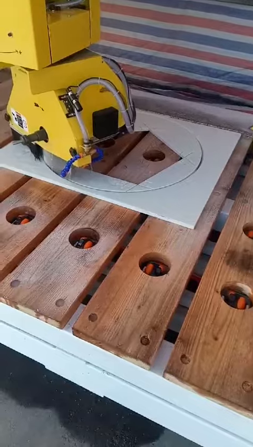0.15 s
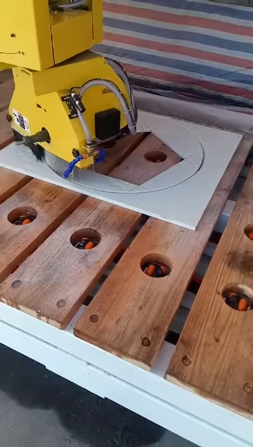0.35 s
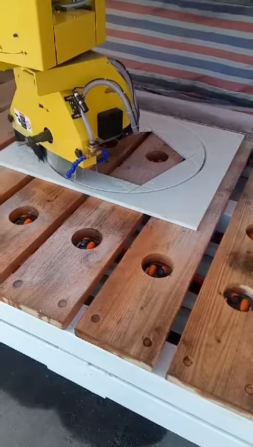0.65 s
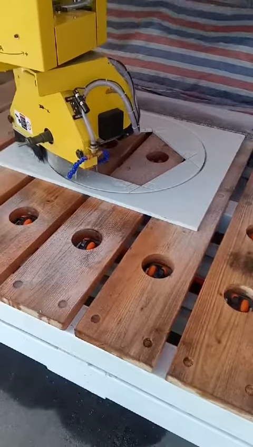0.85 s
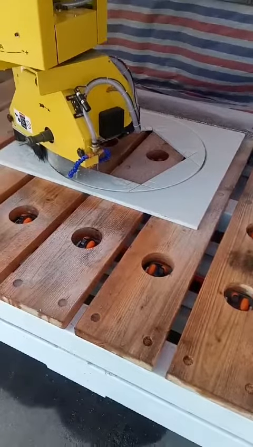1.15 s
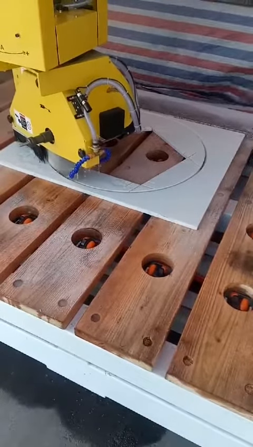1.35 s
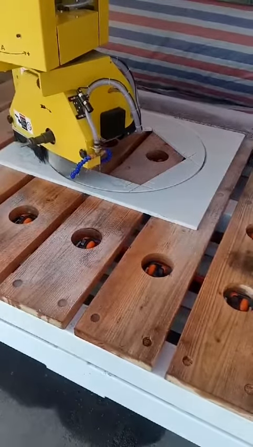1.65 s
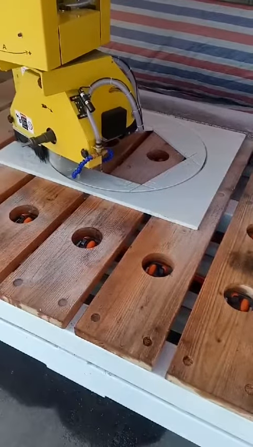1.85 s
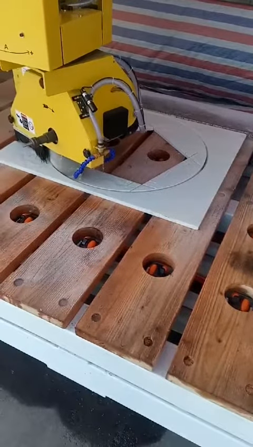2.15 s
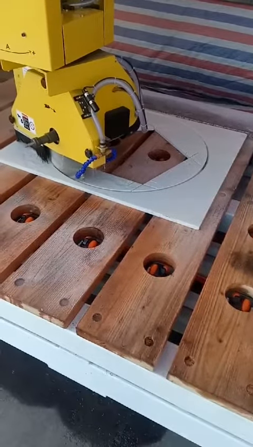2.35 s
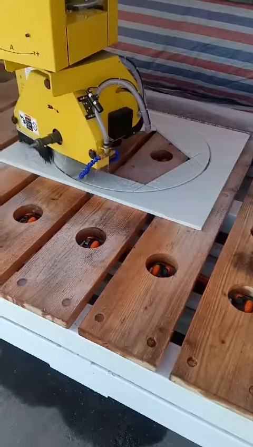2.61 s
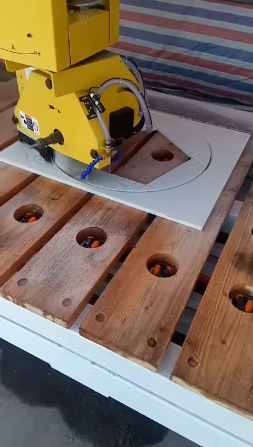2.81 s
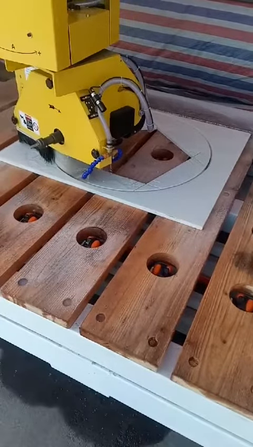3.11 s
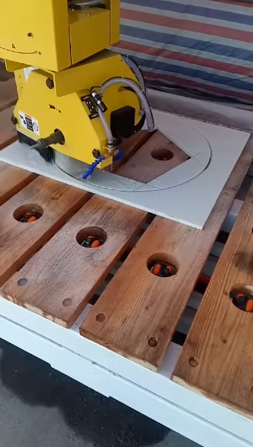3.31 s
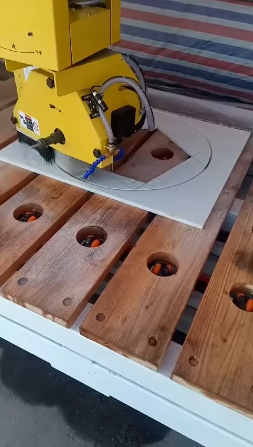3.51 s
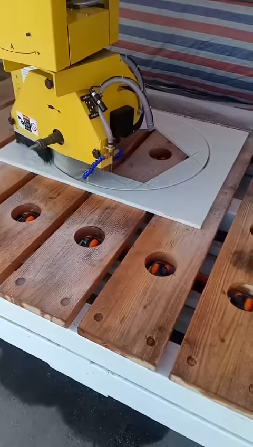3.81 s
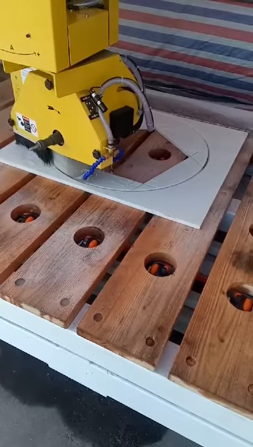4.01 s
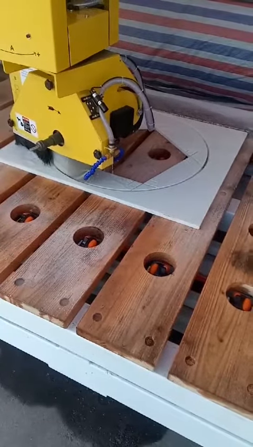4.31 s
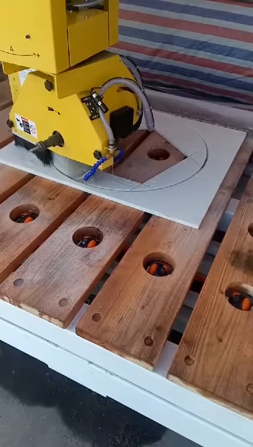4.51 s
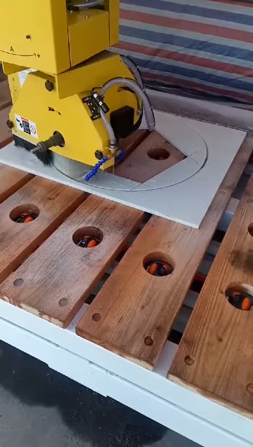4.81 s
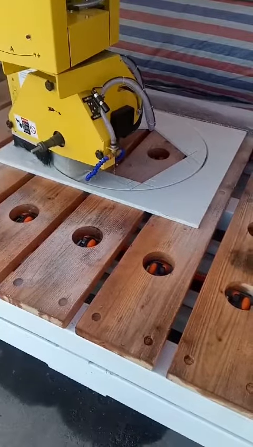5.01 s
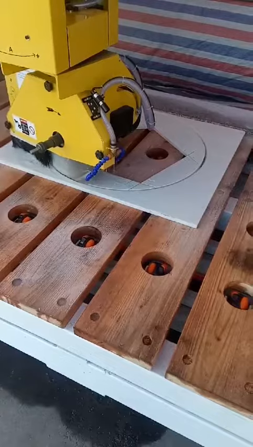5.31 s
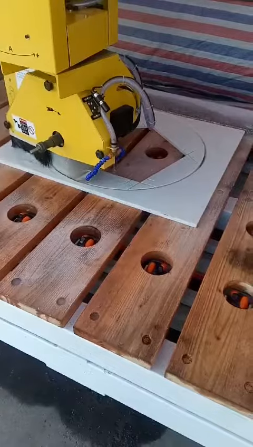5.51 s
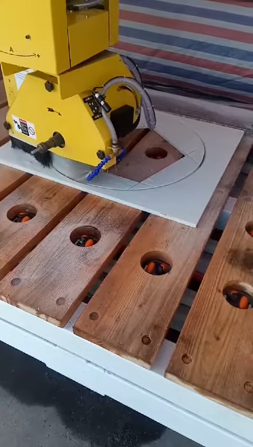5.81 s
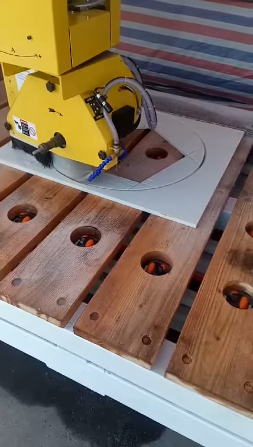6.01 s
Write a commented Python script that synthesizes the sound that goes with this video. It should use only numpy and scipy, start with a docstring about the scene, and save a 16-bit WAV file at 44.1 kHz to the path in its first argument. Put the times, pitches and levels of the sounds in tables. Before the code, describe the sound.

Continuous loud stone cutting, already under way and never stopping. The spinning diamond disc whines at several fixed high pitches with a rapid once-per-turn flutter, over harsh grinding and a raspy motor-rate buzz. Midway the tone shifts, the lower squeal dominates and rumble swells; individual whistles flare and fade. Close, nearly mono pickup, hard-limited, little sense of room.

```python
"""Beside a bridge saw: a water-cooled diamond blade cuts a curve in a stone slab, close to a near-mono microphone.
The rim scrapes nearly the same pattern into the kerf on every turn: a dense buzz on the orders of the spindle.
Blade modes lock onto a few orders and squeal, the lowest much louder as the blade swings into the curve.
Grit rings the disc and a rumble grows with the swing; a limiter holds the peaks.
A faint fluttering stereo hiss lies near 9.6 kHz."""
import sys
import numpy as np
from scipy.fft import rfft, irfft, next_fast_len
from scipy.io import wavfile
from scipy.ndimage import uniform_filter1d, minimum_filter1d, map_coordinates

SR = 44100
rng = np.random.default_rng(int(sys.argv[2]) if len(sys.argv) > 2 else 0)


def to_wav(s):
    """Save 16-bit WAV."""
    ch = np.atleast_2d(s).T  # columns
    pcm = np.round(np.clip(ch, -1, 1) * 32767)  # PCM
    wavfile.write(sys.argv[1], SR, pcm.astype(np.int16))


N = 271345
SPINDLE_HZ, TOP_HZ = 49.552, 15600


def amp(db):
    """Decibels to gain."""
    return 10 ** (np.asarray(db) / 20)


def along(points, hz):
    """(Hz, value) points read on a log axis."""
    point_hz, values = np.transpose(points)
    return np.interp(np.log(hz + 1), np.log(point_hz + 1), values)


def curve(points, t):
    """(s, value) points read at times t."""
    point_s, values = np.transpose(points)
    return np.interp(t, point_s, values)


def wobble(knots_per_s):
    """A smooth random curve through normal-distributed knots."""
    knots = rng.standard_normal(int(N * knots_per_s / SR) + 4)
    return map_coordinates(knots, [np.arange(N) * knots_per_s / SR], mode="mirror")


def drift(shape, memory_turns):
    """Complex chance of rms 1 whose rows, one a turn, stay alike for about memory_turns."""
    z = rng.standard_normal(shape) + 1j * rng.standard_normal(shape)
    cycles_per_turn = np.fft.fftfreq(shape[0])[:, None]
    smoothing = 1 / (1 + (2 * np.pi * memory_turns * cycles_per_turn) ** 2)
    z = np.fft.ifft(np.fft.fft(z, axis=0) * smoothing, axis=0)
    return z / np.sqrt(np.mean(np.abs(z) ** 2))


def filtered(x, response):
    """x times a response of frequency in Hz."""
    m = next_fast_len(N + SR // 4)
    return irfft(rfft(x, m) * response(np.fft.rfftfreq(m, 1 / SR)), m)[..., :N]


def white():
    """Noise of 0 dB per Hz."""
    return rng.standard_normal(N) * np.sqrt(SR / 2)


def spindle(waver_hz=0.012, shake_hz=0.0301):
    """Turns made so far; the load barely disturbs the motor."""
    return np.cumsum(SPINDLE_HZ + waver_hz * wobble(3) + shake_hz * wobble(25)) / SR


def rim(turns, memory_turns=20, dispersion_turns_per_order=.025, scatter_rad=0.9, size=4096, count=314):
    """The scrape of one turn repeats on the next, changing slowly as the blade meets new stone."""
    # Low buzz of spindle, guard and table. Each row: order, dB before the swing, dB at full swing.
    hum_orders = [(1, -67, -51), (2, -56, -52), (3, -48, -50), (4, -50, -49), (5, -50, -50), (6, -37, -33),
                  (7, -42, -37), (8, -29, -29), (9, -39, -41), (10, -40, -42), (11, -30.5, -42),
                  (14, -40, -44), (15, -40, -40), (16, -39, -45), (18, -39, -38), (20, -36, -32),
                  (21, -37, -44), (22, -33, -34), (25, -34, -36), (26, -43, -37), (27, -40, -35),
                  (28, -32, -41), (29, -35, -39), (32, -30, -32)]
    # Orders the steel disc radiates strongly. Each row: order (rounded), dB before the swing, dB at full swing.
    ring_orders = [(33, -67, -35), (35, -26.5, -23), (36, -37.5, -40.5), (37, -25, -34), (38, -29, -24),
                   (41, -27.5, -24.5), (42, -25, -35), (43, -24, -34), (48, -37.5, -26.5), (50, -32.5, -31),
                   (54, -25.5, -32), (55, -21, -27), (56, -38, -26), (60, -22.5, -35.5), (61, -30.5, -22),
                   (62, -22.5, -31.5), (65.98, -26.5, -25), (67, -23.5, -31), (68, -22.5, -25),
                   (74, -26.5, -29), (76.2, -28, -28.5), (78.2, -26, -32), (79, -33.5, -21),
                   (85, -28.5, -23), (86, -26.5, -29.5), (87, -31, -27.5), (93.1, -28.5, -29),
                   (96, -35, -31), (99.5, -33.5, -35), (110, -37, -38), (120, -38, -39.5),
                   (122.8, -34, -36), (130.4, -33.5, -31.5), (145, -42, -46), (159, -50, -43)]
    # All the other orders. Each row: frequency in Hz, level of one order in dB.
    buzz_points = [(600, -47), (1200, -46), (1550, -65), (2200, -33), (3000, -38.5), (3700, -28.5),
                   (4400, -35), (4900, -37.5), (5650, -46.5), (6550, -40), (7500, -45), (8600, -53.5),
                   (10200, -53.5), (14000, -65)]
    # Treble rise and fall as the blade's face turns. Each row: time in s, tilt in dB (weighted over Hz below).
    bright_points = [(0, -0.5), (2, -1.5), (3, 0.5), (4.7, 0.5), (5.3, -1.5), (6.15, -1)]

    order = np.arange(count)
    hz = order * SPINDLE_HZ
    when = np.arange(int(turns[-1]) + 3) / SPINDLE_HZ
    shape = (len(when), count)

    early, late = np.tile(along(buzz_points, hz), (2, 1))
    # loose: share of power that changes; fine kerf detail, in the high orders, most, strong orders half
    loose = np.clip(along([(400, 0.11), (1500, 0.31), (3500, 0.36), (7000, 0.47)], hz), 0, 1)
    for table in (hum_orders, ring_orders):
        for k, early_db, late_db in table:
            early[round(k)], late[round(k)] = early_db, late_db
            loose[round(k)] /= 2

    base_db = early + swing(when)[:, None] * (late - early)
    bright_db = curve(bright_points, when)[:, None] * along([(4300, 0), (5500, 0.95)], hz)
    # single orders swell and sink over about a second
    swell_db = 4 * np.sqrt(loose) * drift(shape, 2 * memory_turns).real
    level_db = base_db + flare(when[:, None], order) + bright_db + swell_db
    level = amp(level_db) * (order > 0)

    # high bending waves cross the disc first: a falling chirp each turn, blurred by random phase
    chirp = np.pi * dispersion_turns_per_order * order ** 2
    blur = scatter_rad * along([(2500, 1.04), (6000, 3.01)], hz) * rng.standard_normal(count)
    lasting = np.exp(1j * (chirp + blur))
    lines = level * (np.sqrt(1 - loose) * lasting + np.sqrt(loose) * drift(shape, memory_turns))
    # one row of waveform a turn, read at the angle of the spindle
    scrape = irfft(lines, size) * size / np.sqrt(2)
    return map_coordinates(scrape, [turns, turns % 1 * size], order=1, mode="grid-wrap")


def squeal(turns, bed, flutter_db=1.0, jitter_rad=0.048, half_width_hz=230):
    """Self-excited blade modes added to the bed; disc run-out chokes each and bends its pitch once a turn."""
    # Each row: order (rounded), dB before the swing, dB at full swing, angle of the choke in turns,
    # depth of the choke 0-1, sharpness of the choke, phase swing in rad.
    locked_modes = [(39, -23.5, -15.5, 0.56, 0.81, 3.6, 0.37), (53, -25, -25.5, 0.23, 0.2, 0.43, -0.06),
                    (75.03, -21, -20, 0.28, 0.57, 2.1, 0.034), (83.95, -23, -21, 0.92, 0.88, 0.18, -0.14)]
    out = bed.copy()
    for k, early_db, late_db, choke_turn, depth, sharpness, phase_swing in locked_modes:
        order = round(k)
        angle = 2 * np.pi * (turns - choke_turn)
        grip = 1 - np.clip(depth, 0, 1) * np.exp(sharpness * (np.cos(angle) - 1))
        phase = 2 * np.pi * order * turns + phase_swing * np.sin(angle) + jitter_rad * wobble(60)
        level_db = squeal_level(order, early_db, late_db) + flutter_db * wobble(40)
        out += amp(level_db) * grip / grip.mean() * np.sqrt(2) * np.sin(phase)
        # the part of the bed near the mode is choked with it
        near = filtered(bed, lambda f: np.exp(-((f - order * SPINDLE_HZ) / half_width_hz) ** 4))
        out += near * (grip / np.sqrt(np.mean(grip ** 2)) - 1)
    return out


def squeal_level(order, early_db, late_db, swell_db=1.46, swells_per_s=8):
    """Mode level in dB: follows the swing, flares, and swells by chance as the rim meets new stone."""
    t = np.arange(N) / SR
    base_db = early_db + swing(t) * (late_db - early_db)
    return base_db + flare(t, order) + swell_db * wobble(swells_per_s)


def flare(t, order):
    """Rise in dB at times t: one order flares up, holds and sinks back."""
    # Each row: middle in s, order, half-length in s, rise in dB.
    flares = [(1.7, 53, 0.96, 6), (2.9, 39, 0.66, 2), (3.6, 84, 0.95, 4), (4.55, 96, 0.3, 8),
              (4.6, 26, 0.69, 7.5), (5.401, 39, 0.44, 4.5), (5.497, 75, 1.0, 6), (5.697, 53, 0.4, 7),
              (5.8, 84, 0.33, 4)]
    return sum(rise_db * (order == round(k)) * np.exp(-((t - middle_s) / half_s) ** 4)
               for middle_s, k, half_s, rise_db in flares)


def swing(t):
    """Share of the blade's swing into the curve at times t."""
    # Each row: time in s, share 0-1.
    travel_points = [(2, 0), (2.8, 0.58), (3.6, 0.83), (4.5, 0.92)]
    return np.clip(curve(travel_points, t), 0, 1)


def grit(turns, swell_db=2):
    """Diamond grains crush stone, harder on one side of the turn, and ring the disc's free modes."""
    # Grinding noise. Each row: frequency in Hz, level in dB per Hz.
    grind_points = [(40, -79), (140, -74), (210, -62), (265, -67.5), (420, -65), (600, -67), (800, -63.5),
                    (1450, -67), (2000, -63), (3800, -62), (5600, -70.5), (7200, -68.5), (10500, -72),
                    (13500, -81)]
    # Free modes of the disc. Each row: frequency in Hz, width in Hz, peak of the mode alone in dB over the grit.
    disc_modes = [(1980, 350, 11.5), (2680, 86, 7.5), (2980, 150, 11.5), (3356, 110, 17), (3735, 74, 17),
                  (4234, 310, 15.5), (4550, 370, 11), (6500, 390, 10.5), (7850, 180, 7.5), (10200, 340, 5)]

    def response(f):
        """Grinding spectrum with the power of each resonance added."""
        extra = sum((amp(db) ** 2 - 1) / (1 + ((f - mode_hz) / width_hz * 2) ** 2) ** 1.11
                    for mode_hz, width_hz, db in disc_modes)
        return amp(along(grind_points, f)) * np.sqrt(1 + extra.clip(0))

    bite = amp(swell_db * np.cos(2 * np.pi * turns))
    return filtered(white() * bite, response)


def rumble(level_db=-61.5, growth_db=11.5, lump_db=4, lumps_per_s=9):
    """Low noise that swells in lumps, louder as the blade swings into the curve."""
    shape_db = [(15, -20), (30, -14), (50, -2), (110, -5), (220, -24), (1000, -100)]
    low = filtered(white(), lambda f: amp(along(shape_db, f)))
    gain_db = level_db + growth_db * swing(np.arange(N) / SR) + lump_db * wobble(lumps_per_s)
    return low / low.std() * amp(gain_db)


def side_hiss(flutter_db=3):
    """A faint fluttering stereo hiss near 9.6 kHz: noise independent in each channel, one shared flutter."""
    # Each row: frequency in Hz, level in dB per Hz.
    hiss_points = [(100, -108), (6500, -102), (8200, -104), (9600, -77), (11500, -86), (13000, -96),
                   (15500, -110)]
    hiss = filtered(np.array([white(), white()]), lambda f: amp(along(hiss_points, f)))
    return hiss * amp(flutter_db * wobble(35))


def flicker(x, depth_db=4, knots_per_s=26):
    """The treble flickers, most at the very top."""
    share = [(4300, 0.2), (6000, 0.31), (10000, 0.73), (13000, 1)]
    treble = filtered(x, lambda f: along(share, f))
    return x + treble * (amp(depth_db * np.tanh(wobble(knots_per_s))) - 1)


def limiter(x, top, size=56):
    """Fast gain reduction, shared by both channels, ducks every peak that would pass top."""
    needed = np.minimum(1, top / (np.abs(x).max(axis=0) + 1e-9))
    return x * uniform_filter1d(minimum_filter1d(needed, size), size)


def scene():
    """The saw, straight ahead of the microphone, and the stereo hiss."""
    turns = spindle()
    bed = rim(turns) + grit(turns)
    return squeal(turns, bed) + rumble() + side_hiss()


def record(dry, drive_db=1, top=.96):
    """Treble flicker, drive into the limiter, then a band limit."""
    limited = limiter(flicker(dry) * amp(drive_db), top)
    return filtered(limited, lambda f: f < TOP_HZ)


dry = scene()
out = record(dry)
to_wav(out)
```